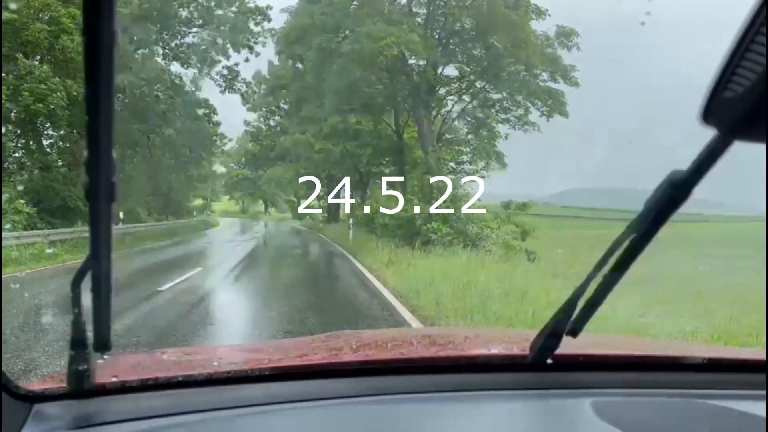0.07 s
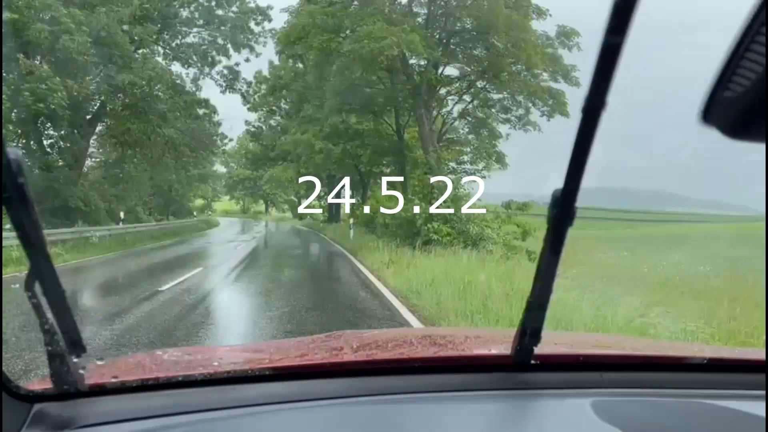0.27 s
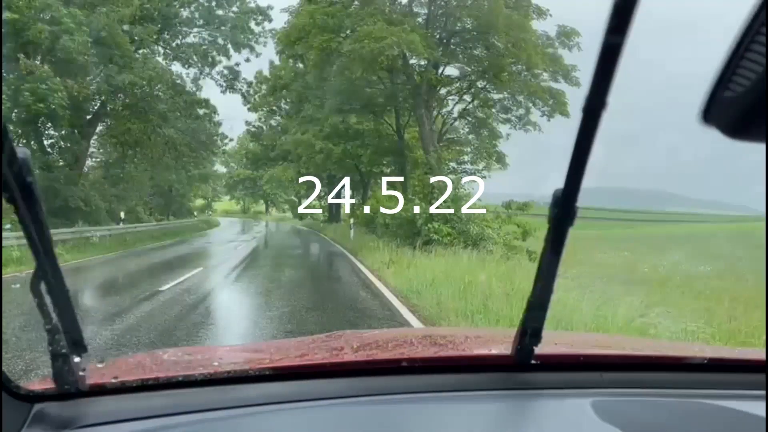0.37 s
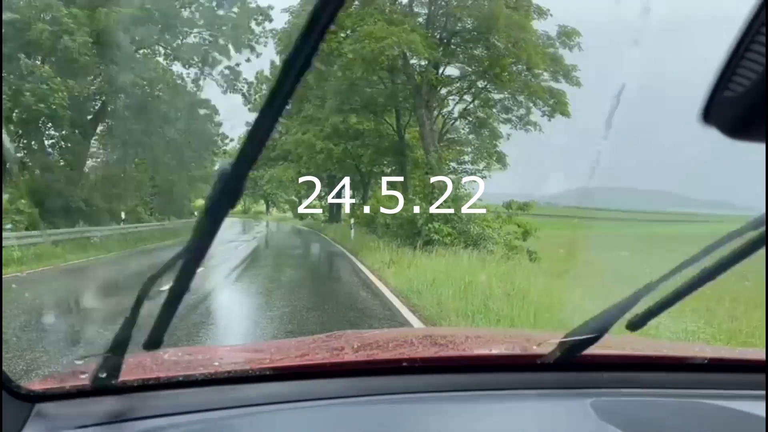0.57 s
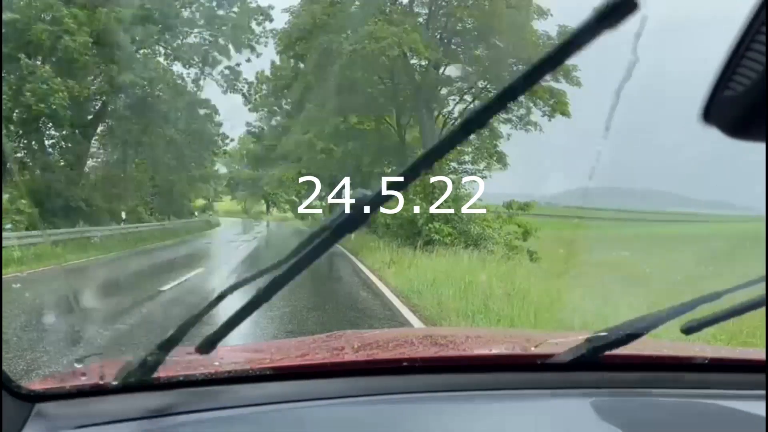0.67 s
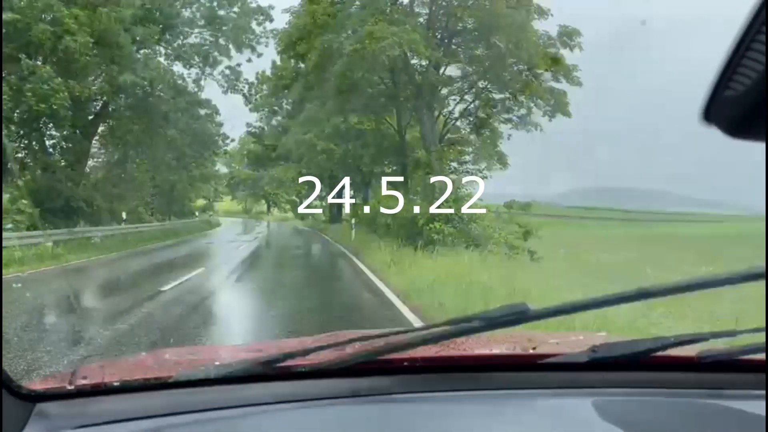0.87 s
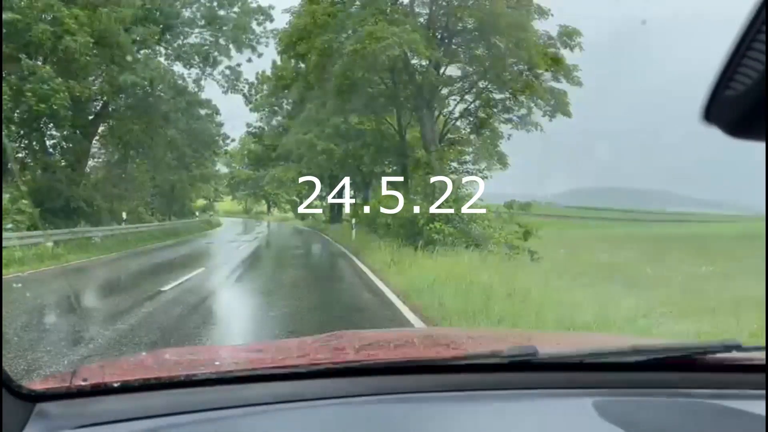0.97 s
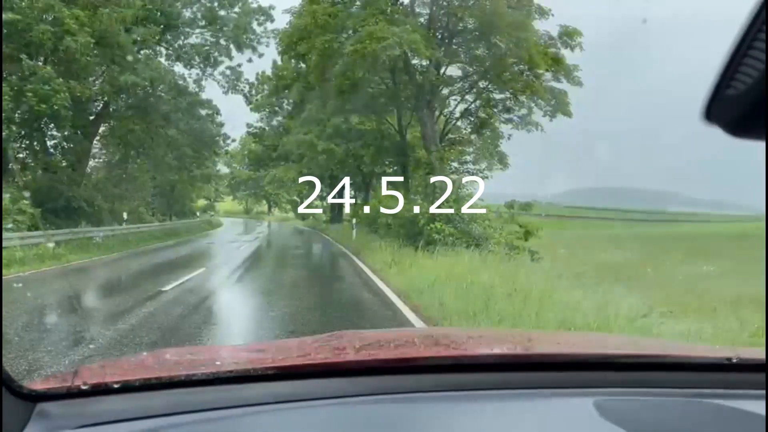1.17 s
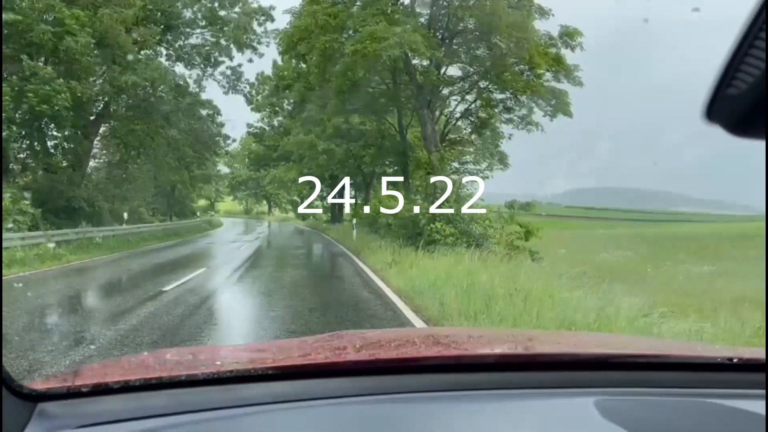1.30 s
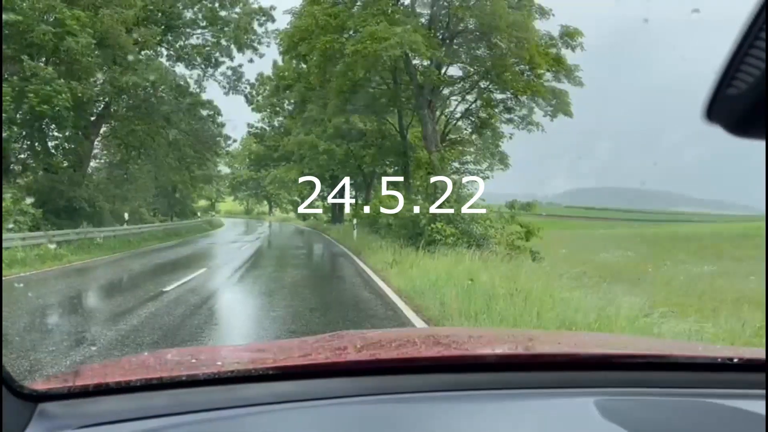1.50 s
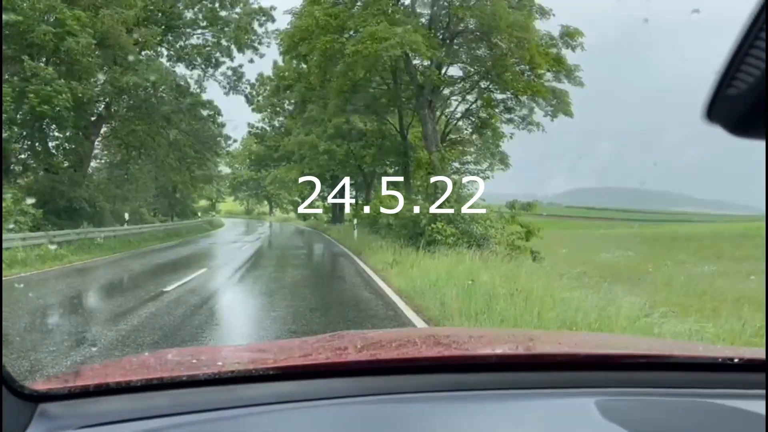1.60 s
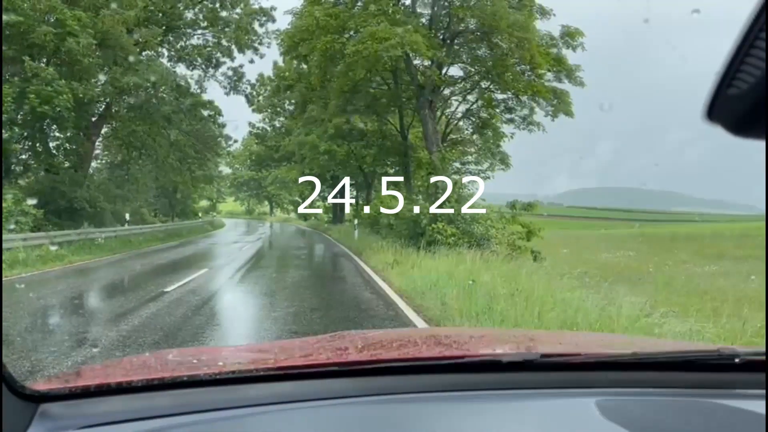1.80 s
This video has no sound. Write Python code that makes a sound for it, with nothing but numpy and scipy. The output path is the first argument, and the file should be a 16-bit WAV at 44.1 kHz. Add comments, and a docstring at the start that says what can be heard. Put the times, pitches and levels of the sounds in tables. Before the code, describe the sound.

Wiper blades judder across a wet windscreen in two bursts of low, stuttering thuds, a short one then a longer, louder one, before stopping; faint rain ticks and low rumble remain, heard close inside a car.

```python
"""Wiper blades judder across a wet windscreen, heard inside a parked car in light rain.
Each slip of the rubber is a swell of sagging pitch; harder jolts and small slips ring damped modes.
The rubber squeaks as wandering tones and a metal joint ticks as ringing modes with bright noise.
Drops tick on the roof as dying noise, over a lumpy rumble and a flickering rain hiss of coloured noise."""
import sys
import numpy as np
from scipy import signal
from scipy.fft import rfft, irfft
from scipy.io import wavfile
from scipy.ndimage import uniform_filter1d

SR = 44100
rng = np.random.default_rng(int(sys.argv[2]) if len(sys.argv) > 2 else 0)


def wrap_up_sound(samples):
    """Save the sound to the file named by the first command line argument, as 16-bit audio."""
    columns = np.atleast_2d(samples).T
    # keep every value between -1 and 1, then stretch to whole-number steps
    tamed = np.clip(columns, -1, 1)
    steps = np.round(tamed * 32767).astype(np.int16)
    wavfile.write(sys.argv[1], SR, steps)


N = 81585

# higher modes of glass and cabin, rung by jolts and chatter: (f/Hz, relative level/dB, t60/s)
KNOCK_MODES = [(299, -3.5, 0.09), (354.4, 3, 0.044), (393.4, 1.5, 0.055), (464, -1.5, 0.062),
               (539, -5, 0.043), (661, -8, 0.032), (734, -5.5, 0.055), (935, -21, 0.027)]


def amp(db):
    """Turn dB into gain."""
    return 10 ** (np.asarray(db) / 20)


def rms_one(x):
    """Scale to rms 1."""
    return x / np.sqrt(np.mean(x ** 2) + 1e-20)


def in_time(rows):
    """Draw a curve of (t/s, value) at every sample."""
    s, value = np.transpose(rows)
    return np.interp(np.arange(N) / SR, s, value)


def at_hz(points):
    """Draw a curve of (f/Hz, value) on the FFT grid, straight over log frequency."""
    hz, value = np.transpose(points)
    return np.interp(np.log(np.fft.rfftfreq(N, 1 / SR) + 1), np.log(hz), value)


def coloured(spectrum):
    """Shape white noise to a spectrum of (f/Hz, level/dB), at rms 1."""
    white = rng.standard_normal(N)
    return rms_one(irfft(rfft(white) * amp(at_hz(spectrum)), N))


def drift(rate_hz):
    """Wander at random: noise through two equal one-pole low-passes, at rms 1."""
    r = np.exp(-2 * np.pi * rate_hz / SR)
    noise = rng.standard_normal(N + SR)  # the first second lets the filter settle
    return rms_one(signal.lfilter([1], [1, -2 * r, r * r], noise)[SR:])


def burst(s, t60, attack_s):
    """Envelope that rises at s while it decays exponentially."""
    t = np.maximum(np.arange(N) / SR - s, 0)
    rise = 1 - np.exp(-t / max(attack_s, 1e-4))
    return rise * amp(-60 * np.minimum(t / max(t60, .004), 3))


def ring(clicks, hz, t60):
    """Damped resonator: a unit click sets a sine of height 1 ringing."""
    r, w = amp(-60 / (t60 * SR)), 2 * np.pi * hz / SR
    return signal.lfilter([0, np.sin(w)], [1, -2 * r * np.cos(w), r * r], clicks + 1e-18)


def strike(modes, at, db):
    """Clicks at samples `at` ring the modes, with one strength and random sign per click and mode."""
    out, signs = 0, rng.choice([-1, 1], db.shape)
    for k, (hz, mode_db, t60) in enumerate(modes):
        clicks = np.zeros(N)
        clicks[at] = amp(db[:, k] + mode_db) * signs[:, k]
        out = out + ring(clicks, hz, t60)
    return out


def soft(x, hz):
    """Soft contact of the rubber: a double one-pole low-pass dulls the blow."""
    r = np.exp(-2 * np.pi * hz / SR)
    return signal.lfilter([(1 - r) ** 2], [1, -2 * r, r * r], x)


def slips():
    """One shudder of the glass: each slip swells it and pulls it towards its own sagging pitch."""
    # slips of the blades: (t/s of the peak, peak level/dB, f/Hz at the peak, time/s to fall 20 dB)
    slip_rows = [(0.037, -36, 168.1, 0.011), (0.093, -38, 175.6, 0.0072), (0.127, -36, 159.7, 0.0081),
                 (0.147, -28.5, 154.3, 0.0074), (0.159, -30.5, 197, 0.0056), (0.176, -34, 164.2, 0.024),
                 (0.197, -26, 222, 0.0082), (0.216, -24.5, 138.3, 0.018), (0.235, -18, 213.1, 0.008),
                 (0.247, -21, 150.9, 0.016), (0.277, -24.5, 141.1, 0.01), (0.299, -24.5, 145.9, 0.0088),
                 (0.311, -22, 176.3, 0.0055), (0.329, -26, 142.2, 0.018), (0.354, -34, 148.5, 0.017),
                 (0.481, -36, 231.3, 0.0089), (0.494, -30, 184.7, 0.0062), (0.516, -37.5, 208, 0.0041),
                 (0.526, -25, 257.6, 0.013), (0.537, -33.5, 219.5, 0.0097), (0.547, -17, 173.1, 0.0064),
                 (0.562, -24, 137, 0.0071), (0.576, -25.5, 124.1, 0.022), (0.597, -26, 185.1, 0.005),
                 (0.609, -19.5, 176.5, 0.0075), (0.623, -32, 129.8, 0.019), (0.64, -20, 178.9, 0.0087),
                 (0.656, -21, 200.2, 0.02), (0.673, -14.5, 293, 0.0031), (0.68, -10.5, 166.4, 0.011),
                 (0.706, -20.5, 194.7, 0.023), (0.72, -26.5, 173.9, 0.017), (0.736, -31.5, 180.7, 0.004),
                 (0.751, -29, 185, 0.0056), (0.763, -44, 178.7, 0.018), (0.779, -26, 167.8, 0.0051),
                 (0.794, -16, 181.2, 0.0061), (0.823, -15.5, 171.3, 0.012), (0.838, -23, 157.7, 0.0083),
                 (0.871, -24, 145.6, 0.0099), (0.884, -20, 156.5, 0.006), (0.907, -11.5, 148.3, 0.0096),
                 (0.929, -30.5, 192, 0.0055), (0.95, -21, 162.9, 0.0071), (0.972, -20.5, 169, 0.0059),
                 (0.992, -20.5, 142.3, 0.011), (1.012, -16, 179.8, 0.0073), (1.034, -19.5, 155, 0.0054),
                 (1.043, -28, 198.2, 0.0031), (1.076, -34, 175, 0.014), (1.094, -22.5, 169.7, 0.022),
                 (1.106, -22.5, 176, 0.0039), (1.113, -25, 153.3, 0.018), (1.135, -25.5, 158.2, 0.0063),
                 (1.144, -26, 160, 0.0044), (1.169, -23.5, 140, 0.014), (1.191, -23.5, 142.3, 0.0062),
                 (1.211, -20, 144, 0.008), (1.223, -28, 156, 0.0057), (1.24, -21.5, 143, 0.0097),
                 (1.269, -38, 146.4, 0.006), (1.814, -31, 155.5, 0.011), (1.84, -29.5, 138, 0.011)]
    sag_oct_per_s, rise_share = 5.2, 0.935  # the rise takes this share of the fall time
    t = np.arange(N) / SR
    power, pull = np.full(N, 1e-9), np.full(N, 160e-9)  # at rest: a trace at 160 Hz
    for s, db, hz, width in slip_rows:
        near = slice(max(int((s - .06) * SR), 0), int((s + .08) * SR))
        u = t[near] - s
        reach = max(width, .003) * np.where(u < 0, rise_share, 1)
        swell = amp(db - 20 * (u / reach) ** 2) ** 2
        power[near] += swell
        pull[near] += swell * hz * 2 ** (-sag_oct_per_s * u)
    pitch = pull / power  # power-weighted mean of the overlapping slips
    turns = rng.random() + np.cumsum(pitch) / SR
    return np.sqrt(power) * np.sin(2 * np.pi * turns)


def jolts():
    """Harder jolts knock the higher modes nearest their centre, dulled by the soft contact."""
    # jolts: (t/s, click level/dB before trim and softening, centre f/Hz)
    jolt_rows = [(0.07, -37.5, 470), (0.146, -32, 500), (0.195, -35, 363), (0.216, -27, 420),
                 (0.227, -21, 440), (0.276, -50, 471), (0.289, -30, 413), (0.328, -45, 378),
                 (0.475, -43, 507), (0.52, -24.5, 468), (0.597, -25.5, 430), (0.64, -49, 456),
                 (0.668, -27, 420), (0.696, -31, 450), (0.714, -42, 561), (0.745, -46, 393),
                 (0.771, -29.5, 430), (0.796, -43, 429), (0.857, -57, 478), (0.879, -39.5, 427),
                 (0.897, -35.5, 446), (0.933, -27, 410), (0.976, -23.5, 397), (0.996, -40, 421),
                 (1.019, -29, 388.5), (1.059, -41, 399), (1.082, -23, 550), (1.111, -32, 460),
                 (1.128, -39, 484), (1.154, -31, 506), (1.18, -30.5, 396), (1.203, -52, 458),
                 (1.231, -43, 478)]
    spread_oct, trim_db, lead_s, contact_hz = 0.35, -5, 0.0021, 900
    s, db, hz = np.transpose(jolt_rows)
    off = np.log2(np.array(KNOCK_MODES)[:, 0] / hz[:, None]) / spread_oct
    strength = db[:, None] + trim_db - 6 * off ** 2 + 3.2 * rng.standard_normal(off.shape)
    # each click leads its listed time
    knocks = strike(KNOCK_MODES, ((s - lead_s) * SR).astype(int), strength)
    return soft(soft(knocks, contact_hz), contact_hz)


def chatter():
    """Small random slips ring low modes under a drag curve and higher ones under a rasp curve."""
    # low modes of glass and cabin: (f/Hz, relative level/dB, t60/s)
    body_modes = [(79.2, -18, 1), (93.1, -6.5, 0.14), (120.4, 0, 0.14), (147.8, 4, 0.084),
                  (164, -3.5, 0.12), (198.4, 2, 0.061), (237.3, 0, 0.13), (263, -3.5, 0.16)]
    # drag of the rubber between slips: (t/s, level/dB)
    drag = [(0.0, -46), (0.566, -42.5), (0.69, -25), (0.766, -31), (1.066, -31), (1.106, -32),
            (1.23, -34.5), (1.255, -51), (1.514, -49.5), (1.85, -51)]
    # rasp of the rubber in the higher modes: (t/s, level/dB)
    rasp = [(0.0, -55), (0.354, -52.5), (0.442, -64), (0.52, -49), (0.668, -46), (1.07, -50),
            (1.204, -56.5), (1.39, -62.5), (1.85, -67)]
    slips_per_s = 200
    at = np.flatnonzero(rng.random(N) < slips_per_s / SR)
    size = 3 * np.minimum(rng.exponential(1, (len(at), 1)), 4)  # dB
    low = strike(body_modes, at, size + rng.normal(0, 2.62, (len(at), len(body_modes))))
    high = strike(KNOCK_MODES, at, size + rng.normal(0, 5.8, (len(at), len(KNOCK_MODES))))
    low_rub = amp(in_time(drag)) * rms_one(soft(low, 270))
    return low_rub + amp(in_time(rasp)) * rms_one(soft(high, 1080))


def squeaks():
    """A rubbed tone: wider bands wander further and faster in pitch, fluttering under a rounded swell."""
    # squeaks and rubs: (t/s, f/Hz, peak level/dB before flutter, length/s, bandwidth/share of pitch)
    squeak_rows = [(0.134, 731, -43.5, 0.025, 0.206), (0.211, 723.3, -29, 0.027, 0.048),
                   (0.228, 720, -43, 0.033, 0.044), (0.218, 1000, -40, 0.019, 0.15),
                   (0.267, 697, -41.5, 0.034, 0.41), (0.631, 990, -48.5, 0.02, 0.1),
                   (0.638, 780, -50.5, 0.02, .15), (0.673, 640, -48, 0.043, 0.32),
                   (0.755, 1149, -50, 0.035, 0.365), (1.074, 723, -36.5, 0.017, 0.3),
                   (1.085, 727, -40, 0.013, 0.097), (1.078, 3330, -47.5, 0.021, 0.1),
                   (1.097, 6200, -57, 0.019, 0.073), (1.115, 2020, -54, 0.024, 0.25),
                   (1.126, 4860, -47, 0.013, .06), (1.126, 1580, -46, 0.026, 0.15),
                   (1.142, 1890, -55, 0.03, .25), (1.149, 680, -39.5, 0.016, .3),
                   (1.186, 894, -46.5, 0.032, 0.19), (1.205, 982, -51, 0.028, .12),
                   (1.367, 620, -48, 0.022, 0.294), (1.578, 2630, -57, 0.038, 0.25)]
    flutter_db, flutter_hz = 2.5, 90
    out, t = np.zeros(N), np.arange(N) / SR
    for s, hz, db, length, width in squeak_rows:
        wander = width / 2 * drift(2 * hz * max(width, .02))
        turns = np.cumsum(hz * (1 + wander)) / SR
        swell = np.sin(np.pi * np.clip((t - s) / length, 0, 1)) ** 2
        out += amp(db) * swell * np.sin(2 * np.pi * turns)
    return out * amp(flutter_db * drift(flutter_hz))


def joint():
    """Three quick touches ring the metal joint of the arm, with a puff of bright noise."""
    # ticks of the joint: (t/s, reference level/dB for touches and puff)
    tick_rows = [(0.4573, -38.5), (0.8026, -48), (1.1163, -38.5), (1.777, -39.5)]
    # modes of the joint: (f/Hz, relative level/dB, t60/s)
    joint_modes = [(4870, -13.5, 0.026), (5468, -10, 0.03), (5670, -1, 0.019), (7180, -14.5, 0.027),
                   (8340, -3, 0.015), (11155, -2, 0.015)]
    gap_s, puff_db, puff_t60_s, puff_attack_s = .0027, -4.5, 0.11, 0.00096
    s, db = np.transpose(tick_rows)
    s = np.r_[s, s + gap_s, s + 2 * gap_s]
    db = np.r_[db - 7, db - 8, db - 11]
    strength = db[:, None] + rng.normal(0, 1.3, (len(s), len(joint_modes)))
    rings = strike(joint_modes, (s * SR).astype(int), strength)
    bright = coloured([(800, 12), (3000, -1.5), (6000, -12.0), (12000, 1)])
    puffs = sum(amp(d + puff_db) * burst(t, puff_t60_s, puff_attack_s) for t, d in tick_rows)
    return rings + bright * puffs


def drops():
    """Drops splash as dying noise with a duller pat, crack more the faster they rise; small ones patter."""
    # raindrops: (t/s, level/dB before trim, t60/s, pat level/dB, treble level/dB, rise/s)
    drop_rows = [(0.053, -49, 0.084, 6, 11, 0.00057), (0.0976, -45.5, 0.19, 3, 8, 0.0027),
                 (0.1395, -44, 0.076, 11.5, 2, 0.0028), (0.167, -37.5, 0.12, 0.5, 9, 0.00048),
                 (0.1914, -50, 0.089, 9, 8, .002), (0.203, -40, 0.068, -6, 7.5, 0.0022),
                 (0.22, -49, 0.065, 13, 0, .002), (0.24, -46.5, 0.065, 11, 4, 0.0019),
                 (0.251, -46, 0.13, -3, 11.5, .003), (0.262, -42.5, 0.13, 0, 5.5, 0.0033),
                 (0.2731, -46, 0.067, 3, 0, 0.0033), (0.283, -36, 0.055, 0, -2, .002),
                 (0.314, -46, 0.059, -11, 12, .002), (0.41, -47.5, 0.28, -13, 3, 0.00045),
                 (0.488, -44.5, 0.068, 7.5, -7, 0.0024), (0.5047, -45, 0.097, 2, 8.5, 0.00027),
                 (0.5116, -46.5, 0.14, 8, -1, 0.0021), (0.574, -50.5, 0.064, 6, 0, .001),
                 (0.598, -48.5, 0.1, 5, -4, 0.0023), (0.6612, -40, 0.031, -8, -6, 0.00092),
                 (0.7088, -45, 0.069, 10.5, 13.5, 0.0017), (0.766, -49, 0.04, 13, 2, 0.0032),
                 (0.833, -43, 0.13, -14, -11, 0.0031), (0.8558, -44, 0.059, -12, 9, 0.0026),
                 (0.8769, -46.5, 0.062, 5, 9, 0.00092), (0.8963, -36.5, 0.11, -2.5, 6, 0.0016),
                 (0.9965, -37, 0.056, -26, 8.5, 0.0017), (1.066, -43, 0.11, -8, -8, 0.00084),
                 (1.089, -39, 0.19, -3, 9, 0.0058), (1.115, -44, 0.18, -5, 7, 0.0073),
                 (1.1494, -40, 0.08, -1, 1, 0.0015), (1.2116, -30, 0.12, -0.5, 8, 0.00097),
                 (1.2488, -40.5, 0.091, 0.5, 11.5, 0.0014), (1.2675, -54, 0.064, -7, -12, .002),
                 (1.2975, -38, 0.1, -4, 4, .004), (1.3209, -39.5, 0.028, -5, 7, 0.00091),
                 (1.3695, -37.5, 0.052, 2, 7.5, 0.0014), (1.3927, -38, 0.11, 1.5, -19, 0.0018),
                 (1.4602, -38, 0.068, -2, 12, 0.0011), (1.585, -43, 0.075, 1.5, -6, 0.0024),
                 (1.6247, -48.5, 0.11, 1, -7, 0.0017), (1.717, -49, 0.1, 6, 1, 0.0022),
                 (1.7582, -45.5, 0.2, 1, 12.5, .001), (1.814, -52, 0.036, 9, -5, 0.0022),
                 (1.8339, -39.5, 0.066, 7.5, 5, 0.00066)]
    # colour of the splash: (f/Hz, level/dB)
    splash_colour = [(240, -6), (400, 0), (500, -12.5), (714, -13), (1790, -10), (2810, -15.5),
                     (4170, -15.5), (9600, -33.5)]
    # its top end: (f/Hz, level/dB)
    splash_top = [(10300, -62), (12100, -68), (20500, -120)]
    trim_db, treble_hz, spatter_db, spatter_hz = -10.5, 4800, 3, 300
    crack_db, crack_t60_s, crack_rise_s = 8, 0.008, .0003
    small_per_s, small_least_db, small_t60_s = 31, -60, 0.031

    splash = coloured(splash_colour + splash_top)
    dull = coloured([(300, -10), (600, -4), (1500, -6), (3000, -25.5)])
    treble = signal.sosfilt(signal.butter(2, treble_hz, "high", fs=SR, output="sos"), splash)
    spatter = amp(spatter_db * drift(spatter_hz))
    out = np.zeros(N)
    for s, db, t60, pat_db, treble_db, rise in drop_rows:
        crack = amp(crack_db) * crack_rise_s / max(rise, crack_rise_s) * burst(s, crack_t60_s, 0)
        envelope = spatter * burst(s, t60, rise) + crack
        noise = splash - treble + amp(treble_db) * treble + amp(pat_db) * dull
        out += amp(db + trim_db) * envelope * noise

    falls = rng.random(N) < small_per_s / SR
    small = falls * amp(small_least_db + 3.4 * np.minimum(rng.exponential(1, N), 4))
    decay = amp(-60 / (small_t60_s * SR))
    return out + signal.lfilter([1], [1, -decay], small) * splash


def rumble():
    """Low coloured noise of wiper drive and cabin, lumpy in level."""
    # level of the rumble: (t/s, level/dB)
    rumble_level = [(0.0, -41), (0.118, -45.5), (0.246, -42), (0.282, -38), (0.462, -46.5), (0.572, -39),
                    (0.648, -53.5), (0.71, -36), (0.772, -44), (0.798, -40.5), (0.926, -43), (0.972, -39),
                    (1.07, -42), (1.122, -30.5), (1.2, -38.5), (1.236, -34), (1.252, -42.5), (1.328, -39),
                    (1.442, -49.5), (1.478, -37.5), (1.582, -48.5), (1.632, -38.5), (1.716, -47.5),
                    (1.85, -35.5)]
    # colour of the rumble: (f/Hz, level/dB)
    rumble_colour = [(20, -23), (33, -0.5), (45, 19), (60, 16.5), (75, 11.5), (100, 16.5), (160, -35)]
    return amp(in_time(rumble_level)) * coloured(rumble_colour)


def rain_hiss():
    """Steady rain as coloured noise whose level flickers at random."""
    # level of the rain hiss: (t/s, level/dB before lift and flicker)
    hiss_level = [(0.0, -54), (0.468, -57.5), (1.22, -55.5), (1.266, -61.5), (1.524, -53), (1.752, -59),
                  (1.85, -55.5)]
    # colour of the hiss: (f/Hz, level/dB)
    hiss_colour = [(120, -39), (200, 2.5), (345, -16.5), (419, -8), (667, -20.5), (1150, -19),
                   (2490, -29.5), (6850, -40.5), (8720, -45), (9600, -46)]
    # its top end: (f/Hz, level/dB)
    hiss_top = [(10300, -80), (12100, -90)]
    lift_db, flicker_db, flicker_hz = 4.5, 2.7, 6.5
    level = in_time(hiss_level) + lift_db + flicker_db * drift(flicker_hz)
    return amp(level) * coloured(hiss_colour + hiss_top)


def stereo(x, t60):
    """A direct mid, and a side of the same sound blurred by decaying noise, strongest near 10 kHz."""
    # side over mid level: (f/Hz, level/dB)
    side_level = [(30, -61.5), (90, -40.5), (260, -19.5), (430, -12.5), (700, -4), (1200, -1), (1800, -0.5),
                  (2300, -3), (3200, -6.5), (5000, -6.5), (6500, -3), (7300, -1.5), (8500, -23),
                  (9200, -4.5), (9700, 8.5), (10000, 24.5), (10600, 22), (11000, -2), (11600, -23.5)]
    # treble gain of the whole mix: (f/Hz, gain/dB)
    treble_gain = [(9000, -1.5), (9900, 1), (10500, 6), (11200, -2.5), (11600, -1)]
    # balance of the channels: (f/Hz, first over second gain/dB)
    balance = [(60, 0.011), (170, 0.38), (490, 0.38), (1390, 0), (3950, 2.2), (11200, 0.09)]
    smear = rng.standard_normal(SR // 5) * amp(-60 * np.arange(SR // 5) / SR / t60)
    scatter = rfft(smear, N)
    # level the broad spectrum, keep the fine scatter
    scatter = scatter / np.sqrt(uniform_filter1d(np.abs(scatter) ** 2, size=150))
    side = amp(at_hz(side_level))
    mid = amp(at_hz(treble_gain)) / np.sqrt(1 + side ** 2)
    tilt = amp(at_hz(balance) / 2)
    pair = np.array([(1 + side * scatter) * tilt, (1 - side * scatter) / tilt])
    return irfft(rfft(x) * mid * pair, N)


def scene():
    """Short sounds get a short side blur, chatter and background a longer one; each group has its own."""
    near_t60_s, cabin_t60_s = .04, .25
    near = sum(stereo(x, near_t60_s) for x in (slips() + jolts(), squeaks() + joint(), drops()))
    return near + stereo(chatter(), cabin_t60_s) + stereo(rumble() + rain_hiss(), cabin_t60_s)


def record(dry):
    """The microphone drops the deepest bass; a steep low-pass cuts the top."""
    low_cut_hz, stop_hz = 36, 12300  # 60 dB down from stop_hz up
    dry = signal.sosfilt(signal.butter(2, low_cut_hz, "high", fs=SR, output="sos"), dry)
    return signal.sosfilt(signal.cheby2(12, 60, stop_hz, fs=SR, output="sos"), dry)


dry = scene()
out = record(dry)
wrap_up_sound(out)
```